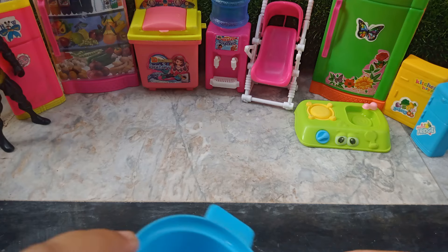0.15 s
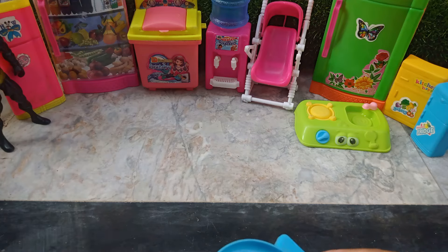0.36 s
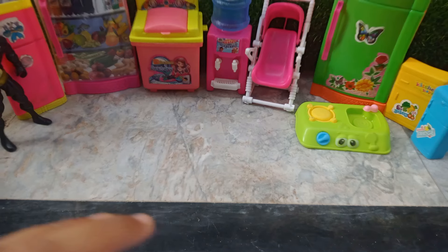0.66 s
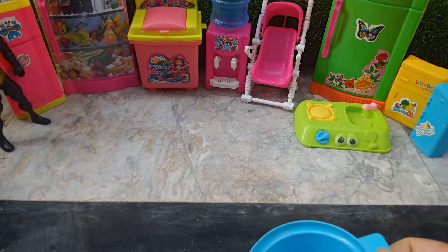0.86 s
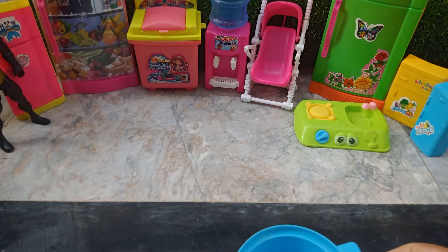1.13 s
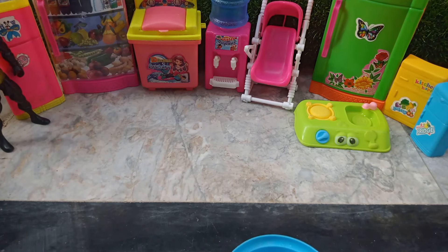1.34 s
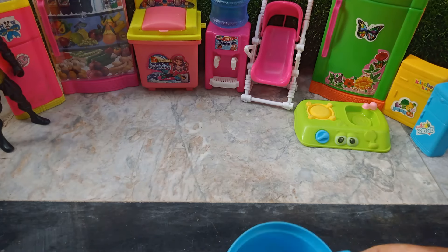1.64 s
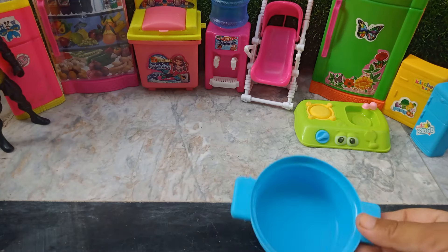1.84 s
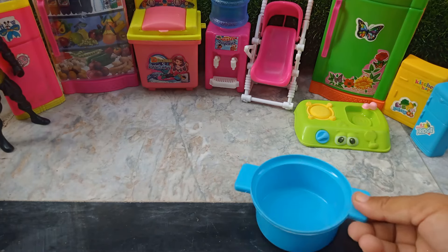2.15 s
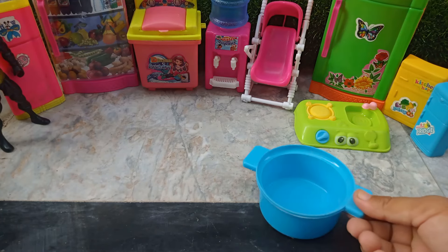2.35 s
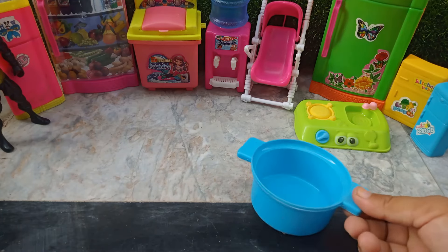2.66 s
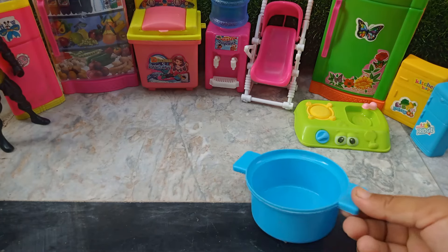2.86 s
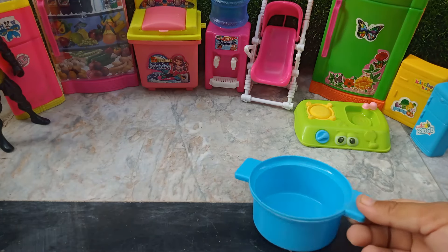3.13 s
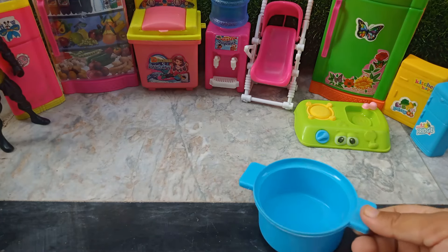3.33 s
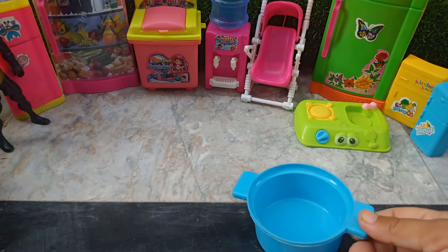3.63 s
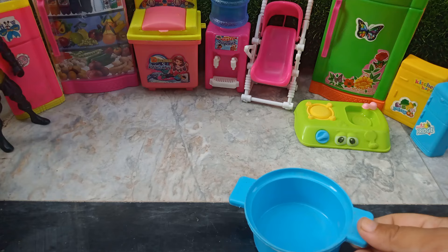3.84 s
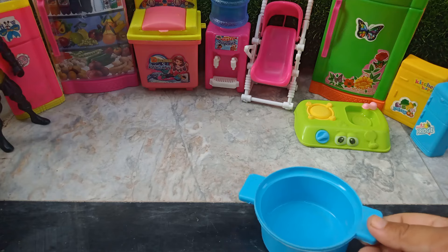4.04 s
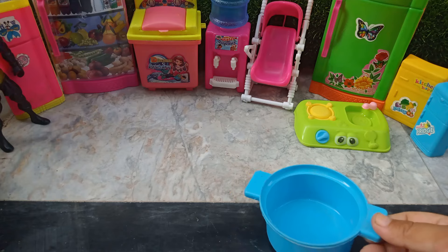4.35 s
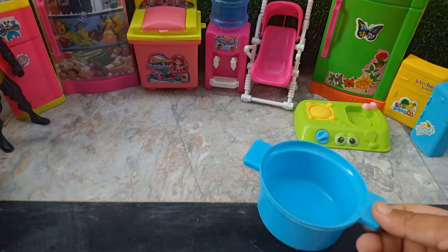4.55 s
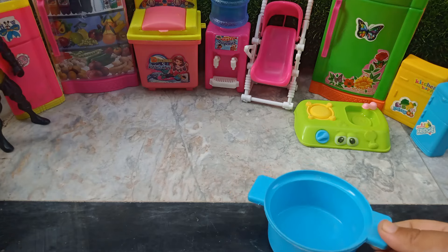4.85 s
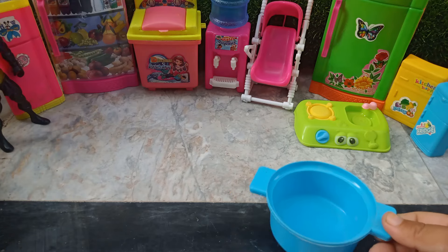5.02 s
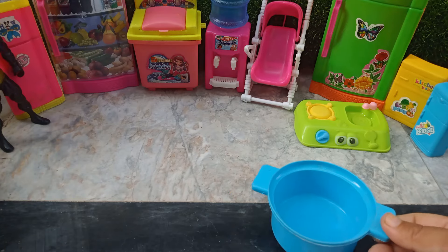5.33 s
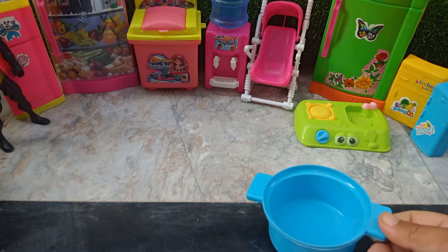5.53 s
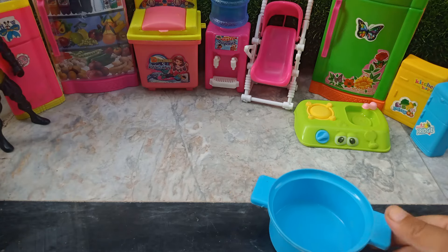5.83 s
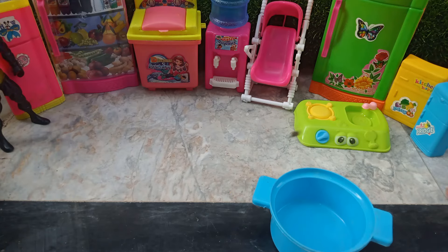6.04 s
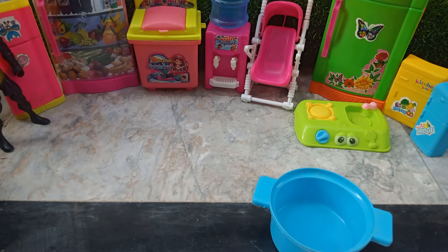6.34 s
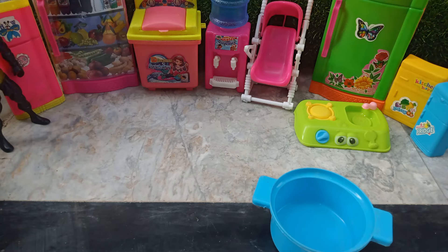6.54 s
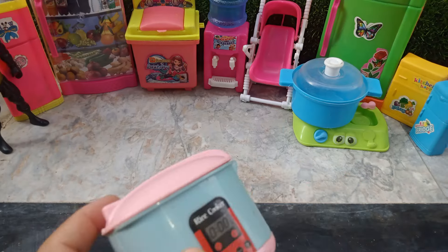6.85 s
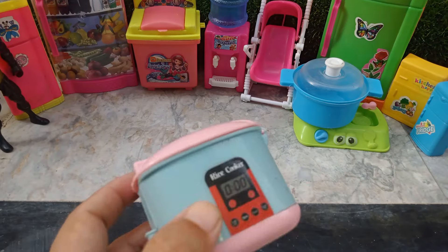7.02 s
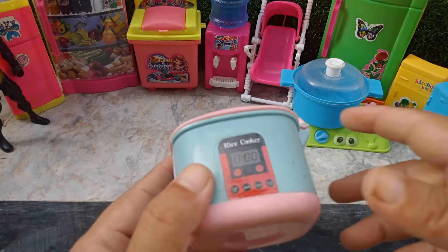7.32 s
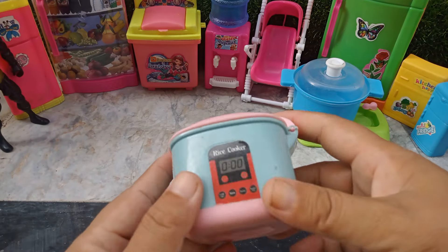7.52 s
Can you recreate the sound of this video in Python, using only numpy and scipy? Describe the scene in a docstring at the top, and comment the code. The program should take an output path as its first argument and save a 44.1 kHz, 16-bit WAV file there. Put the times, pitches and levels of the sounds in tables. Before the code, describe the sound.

A hollow plastic toy pot is tapped repeatedly on a hard table with short scrapes, finger rubbing, soft thuds and faint birds outside.

```python
"""A hollow plastic toy pot is tapped on a table top: each blow rings decaying modes with a short noise crack.
Its lid and other light pieces click the same way; pushes of the pot scrape as random catches ring its wall.
Fingers rub the plastic as finer crackle, and hands bump the table with dull thuds over a low rumble.
Discrete echoes and a diffuse tail make the small room around them.
Small birds, gliding sines with a rough pitch, chirp faintly from outside over a quiet noise background."""
import sys
import numpy as np
from scipy import signal
from scipy.fft import rfft, irfft
from scipy.io import wavfile
from scipy.ndimage import uniform_filter1d

SR = 44100
rng = np.random.default_rng(int(sys.argv[2]) if len(sys.argv) > 2 else 0)


def transcribe(u):
    """Save the signal u as a 16-bit wav file named by the first command-line argument.

    u: samples, shape (n,) or (channels, n), limited to [-1, 1]; the rate is SR.
    q: integer samples, one column per channel.
    """
    v = np.clip(np.atleast_2d(u).T, -1, 1)
    q = np.round(v * 32767).astype(np.int16)
    wavfile.write(sys.argv[1], SR, q)


N = 338688
TIME = np.arange(N) / SR

# modes of the pot on the table and of its lid, before each blow varies them: pitch_hz, level_db, t60_s
POT_MODES = [(449, -21.5, 0.031), (842, -10.5, 0.014), (1254, -7, 0.0083), (1508, -10, 0.039),
             (1758, -16, 0.022), (2150, -13.5, 0.011), (3075, -12.5, 0.0051), (3510, -30, 0.043),
             (3420, -18.5, 0.016), (3854, -21, 0.022), (5180, -17, 0.01), (6820, -15.5, 0.009),
             (8380, -13, 0.0061), (9125, -12.5, 0.012), (12500, -45.5, 0.005)]
LID_MODES = [(641, -10.5, 0.096), (980, -9, 0.01), (1270, -16.5, 0.045), (1585, -13, 0.012),
             (2280, -15.5, 0.03), (3100, -12.5, 0.0049), (3000, -11, 0.0049), (5960, -20.5, 0.0062),
             (9330, -16.5, 0.0097)]
# the pot meets the table; the lid and other light pieces click: start_s, level_db,
# edge_db (+ on the rim, - flat on the base), tick_db (against the level)
POT_TAPS = [(1.927, -15, 6.5, -8.5), (1.946, -24, -4.5, -8), (2.19, -13, 2.5, -5), (2.394, -13.5, 3, -8.5),
            (2.406, -26.5, -6, -8), (2.576, -18, 0.5, -3), (2.771, -18.5, -2, -4), (3.09, -17, 2, -2.5),
            (3.241, -46, -7.5, -3.5), (3.37, -17, -0.5, -.5), (3.578, -35, 8, -8), (3.632, -17, 1, -16.5),
            (3.729, -24.5, 9, -21), (3.924, -40, -4, -7), (4.065, -28, 4, -16), (4.156, -32.5, -15, -14),
            (4.178, -25, -3, -16), (4.252, -41, 29, 9), (4.356, -22.5, -2.5, -21), (4.481, -36, 6.5, -5),
            (4.662, -14.5, -4, -5.5), (4.857, -17.5, -4.5, -2), (4.994, -36, -9.5, -21),
            (5.313, -38, -21.5, -7), (5.435, -34, -15, -18), (5.561, -38.5, 0.5, -15), (5.577, -49, -6, -8),
            (5.708, -21.5, -1, -5), (5.842, -47.5, 3, -14)]
LID_TAPS = [(0.98, -19, 3.5, -10.5), (1.111, -39.5, -14.5, 1), (1.424, -56, 12, 4), (1.467, -63, -1, 17),
            (1.806, -59.5, -7, 15), (2.47, -54, 3, 6), (2.993, -50, 14, 12.5), (5.983, -54.5, 12.5, -9),
            (6.011, -54, 18, 2), (6.043, -65, 12, 12), (6.056, -57.5, 21, 16.5), (6.252, -54.5, -2, -13),
            (6.355, -60, -3, -14), (6.471, -60, -7.5, -24), (6.586, -51.5, 8, -7), (6.695, -61, 0, -24),
            (6.802, -62, -2, -27), (6.847, -54.5, 11, -14)]
# knock, ring, clack and tick regions of a blow: low_hz, high_hz
TAP_BANDS = [(300, 1200), (1200, 2000), (2000, 5000), (5000, 16000)]
# a blow on the rim trades low knock for clack: dB against the level, and dB gained per dB of edge
KNOCK_DB, KNOCK_SLOPE, CLACK_DB, CLACK_SLOPE = -3, -0.45, -3, 0.69
# level at the very top against the tick, and dB gained per dB of tick up to a tick of 0 dB
TOP_DB, TOP_SLOPE = -3.5, 0.5
TABLE_ECHO_S, TABLE_ECHO_DB = 0.003585, -9

# the pot is pushed over the table, before the mix trims: start_s, length_s, rise_s, level_db, grit_db
PUSHES = [(3.578, 0.097, .003, -30.5, -46), (3.701, 0.063, 0.019, -30.5, -45),
          (3.912, 0.41, 0.17, -28, -38), (4.342, 0.091, 0.024, -32, -42), (4.483, 0.23, 0.0069, -34.5, -46)]
PUSH_SAG_DB_PER_S, PUSH_RELEASE_S = -7, 0.032
# the base snags and the scrape flares up, before the mix trims: start_s, level_db
SNAGS = [(3.607, -26.5), (3.634, -25), (3.73, -29), (4.253, -25), (4.611, -20.5), (4.626, -25),
         (4.665, -30)]
SNAG_DECAY_S, SNAG_GRIT_DB = 0.011, -10.5  # grit against the snag's level
# resonances of sliding and rubbing (the level is halved, then offset, in use): pitch_hz, width_hz, level_db
SLIDE_PEAKS = [(1020, 240, -4.5), (1446, 71, -6.5), (2070, 92, -17.5), (2630, 130, -3), (3650, 120, -13),
               (3940, 590, -5), (4420, 17, -15.5), (5760, 1200, -1.5), (7310, 33, -16.5), (8880, 310, -15)]
# broad colour under the sliding resonances: pitch_hz, level_db
SLIDE_COLOUR = [(120, -55.5), (200, -23), (491, -9.5), (696, -12), (851, -13.5), (933, -17), (1450, -6),
                (1940, -11), (2610, -10.5), (3370, -18), (4520, -16.5), (5520, -25.5), (8270, -18.5),
                (16000, -32)]

# a finger or an edge drags over the plastic, before the mix trims: start_s, length_s, hollow_db, hiss_db
RUBS = [(0.0, 0.09, -53.5, -58.5), (0.137, 0.037, -56.5, -53), (0.225, .15, -66, -71),
        (0.573, 0.32, -57, -63.5), (1.013, 0.11, -56, -52.5), (1.066, 0.023, -36, -38),
        (1.143, .34, -46.5, -48.5), (1.505, 0.31, -59, -66), (1.823, 0.096, -57, -68),
        (2.728, 0.018, -38, -43), (2.812, 0.071, -39.5, -41), (2.907, 0.23, -50.5, -58),
        (3.211, 0.14, -45, -56), (3.43, 0.066, -69, -56), (3.521, 0.04, -43, -58),
        (3.888, 0.013, -35.5, -54), (5.427, .19, -47.5, -60.5), (5.534, 0.034, -41.5, -57),
        (5.84, 0.016, -49, -60), (5.941, 0.12, -55, -66), (6.567, 0.0086, -49, -64),
        (6.839, 0.018, -53, -62), (6.894, 0.437, -63, -67.5), (7.538, .14, -66, -62.5)]
RUB_RISE_S, RUB_SAG_DB_PER_S, RUB_RELEASE_S = 0.013, 0, 0.033
# broad colour of the rubbing: pitch_hz, level_db
RUB_COLOUR = [(300, 5), (600, -1), (1000, -3.5), (1500, -1), (2200, -2.5), (3500, 4), (5000, 2),
              (7000, -8.5), (9400, -2), (10500, -13.5), (15500, -15.5)]

# hands bump the table: start_s, peak_db
BUMPS = [(0.051, -40.5), (.547, -31.5), (0.599, -31), (.635, -31.5), (0.744, -30.5), (.795, -31),
         (0.935, -33.5), (1.108, -37.5), (1.788, -35), (3.561, -30.5), (3.792, -36), (3.888, -29),
         (4.115, -27), (4.352, -27), (4.405, -31)]
SHAKE_DB, SHAKE_DECAY_S = -17.5, 0.079  # the table shakes on after a bump: level against the bump
LEAN_UNTIL_S, LEAN_DB = 4.76, -59.5  # low rumble while a hand leans on the table

# reverberation time, before each reverb scales it: pitch_hz, t60_s
ROOM_T60 = [(200, 0.43), (1500, 0.17), (4000, 0.27), (9000, 0.14), (16000, 0.39)]
# separate wall reflections: delay_s, level_db
WALL_ECHOES = [(0.0123, -30), (.0172, -24.5), (0.0191, -21), (.0225, -27), (.038, -24)]

# one bird slurs whistles, before the direct and wet mix: start_s, start_hz, end_hz, level_db
WHISTLES = [(.015, 4580, 4000, -51.5), (.14, 5230, 3900, -58.5), (0.888, 6070, 3700, -52.5),
            (1.232, 6100, 4100, -41), (1.338, 5470, 4700, -47), (1.5, 5720, 4300, -46),
            (2.159, 4400, 5800, -54.5), (3.462, 4780, 3900, -54.5), (5.445, 4290, 3750, -50.5)]
WHISTLE_S, WHISTLE_OCTAVE_DB, WHISTLE_RASP = 0.063, -22, 0.045  # rasp: wobble as a share of the pitch
# another gives a run of husky cheeps, before the same mix: start_s, pitch_hz, level_db
CHEEPS = [(6.918, 3070, -52), (7.043, 3720, -55), (7.143, 3400, -58), (7.253, 3110, -56),
          (7.385, 2920, -65)]
CHEEP_S, CHEEP_OCTAVE_DB, CHEEP_RASP = 0.028, -1, 0.092
NOTE_AT_S, NOTE_S, NOTE_HZ, NOTE_DB = 1.47, 0.3, 2920, -64.5  # a far bird holds one thin note

# tone of the quiet background: pitch_hz, level_db
AMBIENCE_COLOUR = [(25, -26), (50, -14), (78, -1), (150, -2.5), (210, -9), (300, 1), (400, -13),
                   (550, -14.5), (1000, -13.5), (1900, -19), (3700, -21.5), (5500, -31), (9500, -29.5),
                   (11000, -38), (16000, -44.5)]
AMBIENCE_DB = -59
TOP_HZ = 16200  # where the phone's steep treble cut starts


def taps(rows, modes, detune, crack_db, crack_s, wall_db, wall_t60, delay_s):
    """Each blow rings modes and thin wall and cracks; its landing sets the knock, ring, clack and tick."""
    out, t = np.zeros(N), np.arange(4096) / SR
    hz, db, t60 = np.transpose(modes)
    sign = (-1) ** np.arange(len(hz))  # neighbouring modes swing against each other
    decay = np.exp(-np.log(1000) * np.outer(1 / t60, t))
    lag = int(TABLE_ECHO_S * SR)
    for s, level_db, edge_db, tick_db in rows:
        chance = rng.standard_normal((2, len(hz)))
        size = sign * undb(db + 2.06 * chance[0])
        pitch = hz * (1 + detune * chance[1] * np.sqrt(hz / hz[3]))  # the grip shifts the high modes most
        blow = size @ (np.sin(2 * np.pi * np.outer(pitch, t)) * decay)
        crack = band(rng.standard_normal(len(t)), 2200, 16000, order=1) * np.exp(-t / crack_s)
        blow += undb(crack_db) * crack
        add(blow, 0, undb(wall_db) * band(shell(wall_t60), 570, 3000, order=1))
        # a near surface throws the blow straight back
        blow[lag:] += undb(TABLE_ECHO_DB) * band(blow, 150, 2800, order=1)[:-lag]
        # balance the four regions from their short-term peak power
        powers = [uniform_filter1d(band(blow, lo, hi) ** 2, size=176).max() for lo, hi in TAP_BANDS]
        now_db = 10 * np.log10(powers)
        shares_db = [KNOCK_DB + KNOCK_SLOPE * edge_db, 0, CLACK_DB + CLACK_SLOPE * edge_db, tick_db]
        knock, ring, clack, tick = level_db + np.array(shares_db) - now_db
        top = tick + TOP_DB + TOP_SLOPE * min(tick_db, 0)  # sharper ticks reach higher
        tone = [(950, knock), (1350, ring), (1750, ring), (2300, clack), (4200, clack),
                (6200, tick), (9500, tick), (15000, top)]
        add(out, s + delay_s, colour(blow, tone))
    return out


def slide(body_trim_db=-2.0, grit_trim_db=-2.0, judder_db=2.5, bite_db=-2):
    """The base catches and slips on the table in uneven spurts; each catch ticks, then rings the pot."""
    body = flares(SNAGS, SNAG_DECAY_S)
    grit = undb(SNAG_GRIT_DB) * body
    for s, length, rise_s, push_db, push_grit_db in PUSHES:
        push = stroke(s, length, rise_s, PUSH_SAG_DB_PER_S, PUSH_RELEASE_S)
        body = body + undb(push_db) * push
        grit = grit + undb(push_grit_db) * push
    slips = catches(1100, 2.25) * undb(judder_db * walk(79))
    force = undb(bite_db) * slips + wandering(slips, t60=0.043, size=4400)
    # the hand's push, not the contact point, sets the loudness
    force /= np.sqrt(uniform_filter1d(force ** 2, size=1500) + 1e-9)
    scrape = colour(force, SLIDE_COLOUR, SLIDE_PEAKS, peak_db=3.5)
    low = body * unit(band(scrape, 180, 3900))
    high = grit * unit(band(scrape, 4800, 13000))
    return undb(body_trim_db) * low + undb(grit_trim_db) * high


def fingers(hollow_trim_db=-2, hiss_trim_db=-1.5, grip_db=6.0):
    """Skin creeps over the thin wall, with some quick scuffs: fine crackle with a hollow undertone."""
    hollow, hiss = 0, 0
    for s, length, rub_hollow_db, rub_hiss_db in RUBS:
        drag = stroke(s, length, RUB_RISE_S, RUB_SAG_DB_PER_S, RUB_RELEASE_S)
        hollow = hollow + undb(rub_hollow_db) * drag
        hiss = hiss + undb(rub_hiss_db) * drag
    force = wandering(catches(4500, 0.93) * undb(grip_db * walk(45)), t60=0.016, size=3000)
    rub = colour(force, RUB_COLOUR, SLIDE_PEAKS, peak_db=-10)
    low = hollow * unit(band(rub, 300, 2500, order=2))
    high = hiss * unit(band(rub, 5600, 19000, order=2))
    return undb(hollow_trim_db) * low + undb(hiss_trim_db) * high


def bumps(low_hz=90, high_hz=170, high_db=-3, swell_s=0.0047):
    """Soft pushes of the hand give short, dull thuds in the table over a low rumble."""
    out, t = np.zeros(N), np.arange(4096) / SR
    for s, db in BUMPS:
        pitch = np.exp(0.17 * rng.standard_normal(2))  # both partials vary from thud to thud
        thud = np.sin(2 * np.pi * low_hz * pitch[0] * t)
        thud -= undb(high_db) * np.sin(2 * np.pi * high_hz * pitch[1] * t)
        thud *= t ** 2 * np.exp(-t / swell_s)
        add(out, s, undb(db) * thud / np.abs(thud).max())
    shake = undb(SHAKE_DB) * flares(BUMPS, SHAKE_DECAY_S)
    lean = undb(LEAN_DB) * stroke(0, LEAN_UNTIL_S, 0.0055, 0, 0.044)
    rumble = unit(band(rng.standard_normal(N), 37, 210, order=2))
    return out + np.hypot(shake, lean) * undb(3.2 * walk(25)) * rumble


def room(x, tail_db=-14.5, tail_top_hz=7000):
    """Hard walls return a few bright echoes; the diffuse tail is duller."""
    out = x + undb(tail_db) * reverb(band(x, 60, tail_top_hz, order=1), 1.234, 0.015)
    for s, db in WALL_ECHOES:
        add(out, s, undb(db) * band(x, 300, 12000, order=1))
    return out


def reverb(x, t60_scale, build_s):
    """Diffuse noise tail of unit energy that swells in, then decays at its own rate in each band."""
    t = np.arange(SR // 2) / SR
    edges = np.geomspace(100, 18000, 9)
    tail = 0
    for lo, hi in zip(edges, edges[1:]):
        t60 = t60_scale * spectrum_at(ROOM_T60, np.sqrt(lo * hi))
        tail = tail + band(rng.standard_normal(len(t)), lo, hi) * np.exp(-np.log(1000) * t / t60)
    tail *= np.minimum(t / build_s, 1) ** 2
    return signal.fftconvolve(x, tail / np.linalg.norm(tail))[:N]


def birds(direct_db=-7, wet_db=0):
    """Husky whistles: sines and their octaves with a rough pitch, blurred on their way in from outside."""
    out, wobble = np.zeros(N), walk(1100)
    for s, length, start_hz, end_hz, db, octave_db, rasp in chirps():
        u = np.linspace(0, 1, int(length * SR))
        glide = start_hz + (end_hz - start_hz) * np.sin(np.pi * u / 2) ** 2
        hz = glide * (1 + rasp * wobble[int(s * SR):][:len(u)])
        phase = 2 * np.pi * np.cumsum(hz) / SR
        swell = np.sqrt(2 * np.abs(np.sin(np.pi * u)))
        add(out, s, undb(db) * swell * (np.sin(phase) + undb(octave_db) * np.sin(2 * phase)))
    return undb(direct_db) * out + undb(wet_db) * reverb(out, 0.65, 0.011)


def chirps():
    """Every bird call as start_s, length_s, start_hz, end_hz, level_db, octave_db, rasp."""
    whistles = [(s, WHISTLE_S, start_hz, end_hz, db, WHISTLE_OCTAVE_DB, WHISTLE_RASP)
                for s, start_hz, end_hz, db in WHISTLES]
    cheeps = [(s, CHEEP_S, hz, hz, db, CHEEP_OCTAVE_DB, CHEEP_RASP) for s, hz, db in CHEEPS]
    note = (NOTE_AT_S, NOTE_S, NOTE_HZ, NOTE_HZ, NOTE_DB, WHISTLE_OCTAVE_DB, WHISTLE_RASP)
    return whistles + cheeps + [note]


def ambience(drift_db=-1.05):
    """Quiet, dull noise background whose level drifts a little."""
    noise = unit(colour(rng.standard_normal(N), AMBIENCE_COLOUR))
    return undb(AMBIENCE_DB + drift_db * walk(6.5)) * noise


def catches(per_s, spread_db):
    """Friction: tiny catches at random moments, a few much larger than the rest."""
    size = undb(spread_db * np.minimum(rng.exponential(size=N), 5))
    return unit((rng.random(N) < per_s / SR) * size * rng.standard_normal(N))


def shell(t60):
    """The crowd of close modes of a thin wall, as met from one random point of contact: decaying noise."""
    t = np.arange(2048) / SR
    ring = rng.standard_normal(len(t)) * np.exp(-np.log(1000) * t / t60)
    return ring / np.linalg.norm(ring)


def wandering(force, t60, size):
    """The contact point moves on every few hundredths of a second, so wall modes take turns to ring."""
    out, fade = np.zeros(N), np.sqrt(signal.windows.hann(size))
    for i in range(0, N - size // 2, size // 2):
        piece = force[i:i + size]
        add(out, i / SR, signal.fftconvolve(piece * fade[:len(piece)], shell(t60)))
    return out


def stroke(s, length, rise_s, sag_db_per_s, release_s):
    """Envelope of one hand movement: it rises, sags at the given rate while it lasts, then dies away."""
    t = np.maximum(TIME - s, 0)
    sag = undb(sag_db_per_s * np.minimum(t, length))
    release = np.exp(-np.clip((t - length) / release_s, 0, 40))
    return np.minimum(t / rise_s, 1) * sag * release


def flares(rows, decay_s):
    """Envelope that jumps at each start_s by level_db and decays."""
    out, t = np.zeros(N), np.arange(SR) / SR
    for s, db in rows:
        add(out, s, undb(db) * np.exp(-t / decay_s))
    return out


def walk(rate):
    """Random drift: straight lines between normal random knots, rate knots per second."""
    knots = rng.standard_normal(N // 20)
    return np.interp(TIME * rate, np.arange(len(knots)), knots)


def colour(x, points, peaks=(), peak_db=0, size=4096):
    """Causal minimum-phase filter with a broad spectrum and resonances that stand out of it."""
    hz = np.arange(size // 2 + 1) * SR / size
    resonance = sum(undb(db / 2) / (1 + (2 * (hz - f) / w) ** 2) for f, w, db in peaks)
    gain = undb(spectrum_at(points, hz)) * (1 + undb(peak_db) * resonance)
    cepstrum = irfft(np.log(gain))[:size // 2]
    cepstrum[1:] *= 2  # folding the cepstrum puts the energy as early as possible
    return signal.fftconvolve(x, irfft(np.exp(rfft(cepstrum, size))))[:len(x)]


def spectrum_at(points, hz):
    """Read pitch_hz, value points on a log-frequency axis."""
    f, value = np.transpose(points)
    return np.interp(np.log(hz + 1e-3), np.log(f), value)


def band(x, lo_hz, hi_hz, order=3):
    """Causal band-pass."""
    edges = [lo_hz, min(hi_hz, 0.45 * SR)]
    return signal.sosfilt(signal.butter(order, edges, "band", fs=SR, output="sos"), x)


def undb(db):
    """Decibels to gain."""
    return 10 ** (np.asarray(db) / 20)


def unit(x):
    """Scale to rms 1."""
    return x / np.sqrt(np.mean(x ** 2) + 1e-20)


def add(track, s, sound):
    """Mix a sound into a track at time s."""
    i = max(0, int(s * SR))
    track[i:i + len(sound)] += sound[:N - i]


def scene():
    """Toys and hands in the room, birds and background behind."""
    pot = taps(POT_TAPS, POT_MODES, detune=0.016, crack_db=-7.0, crack_s=0.0011,
               wall_db=7.5, wall_t60=0.03, delay_s=0.001243)
    lid = taps(LID_TAPS, LID_MODES, detune=0.0083, crack_db=-14, crack_s=0.0026,
               wall_db=-2.0, wall_t60=0.052, delay_s=0.0018)
    near = room(pot + lid + slide() + fingers() + bumps())
    return (near + birds() + ambience())[None]


def record(dry):
    """The phone rounds the loudest peaks and cuts the deepest bass and the top."""
    rounded = np.tanh(0.6 * dry) / 0.62
    trimmed = band(rounded, 40, 19000, order=2)
    return signal.sosfilt(signal.ellip(8, 0.2, 70, TOP_HZ, fs=SR, output="sos"), trimmed)


dry = scene()
out = record(dry)
transcribe(out)
```